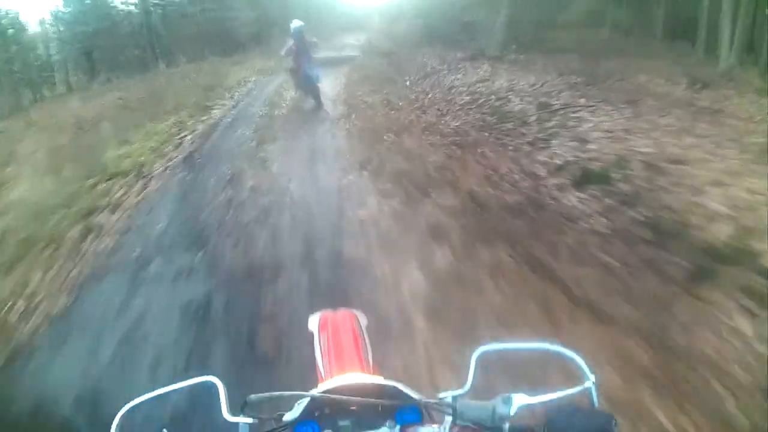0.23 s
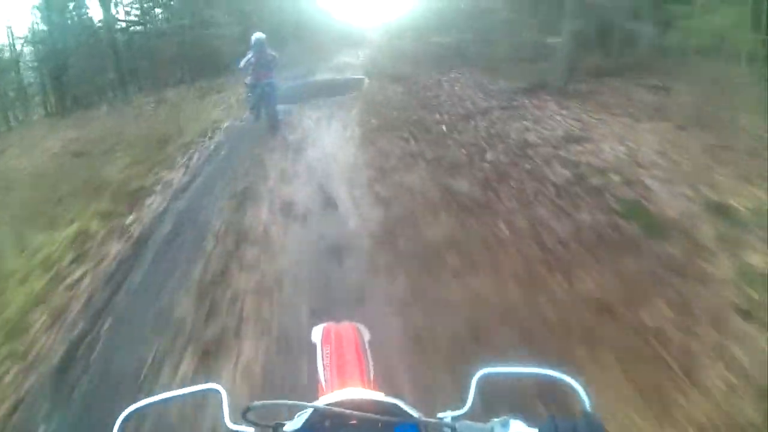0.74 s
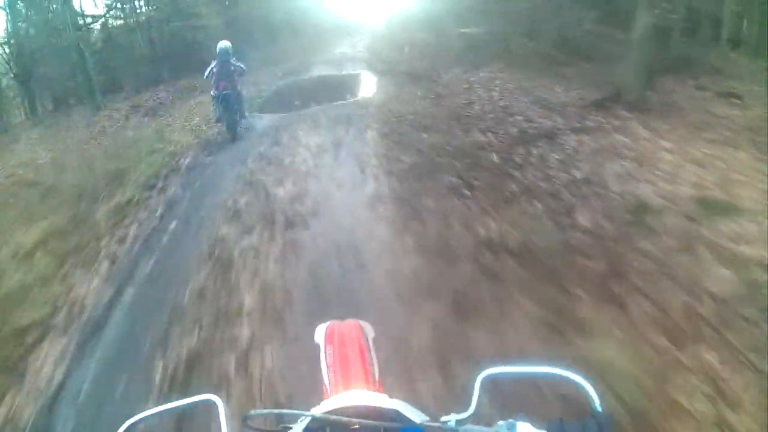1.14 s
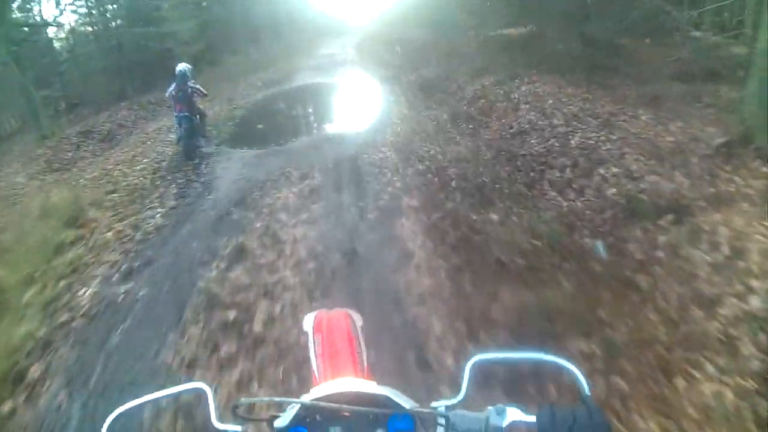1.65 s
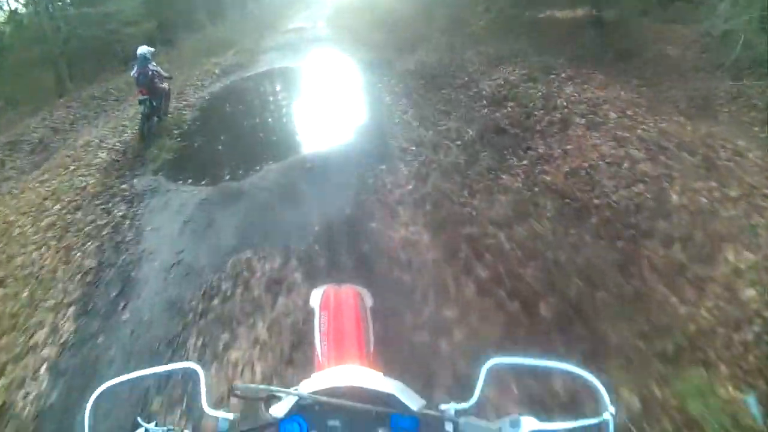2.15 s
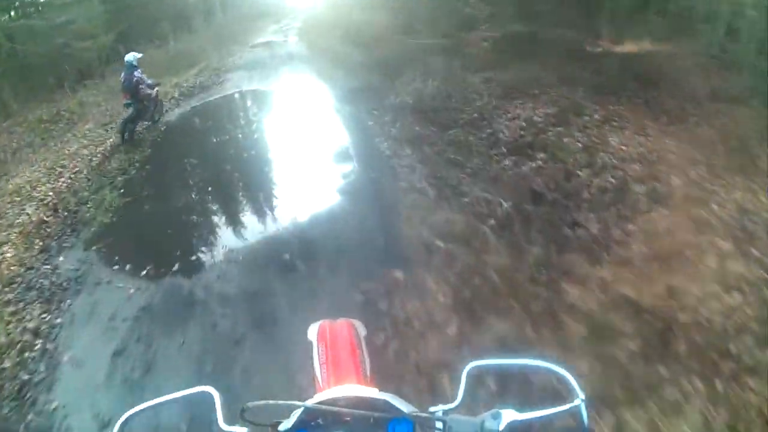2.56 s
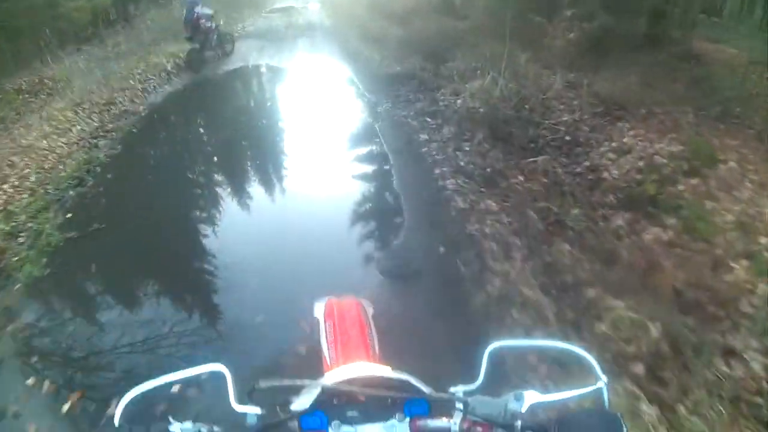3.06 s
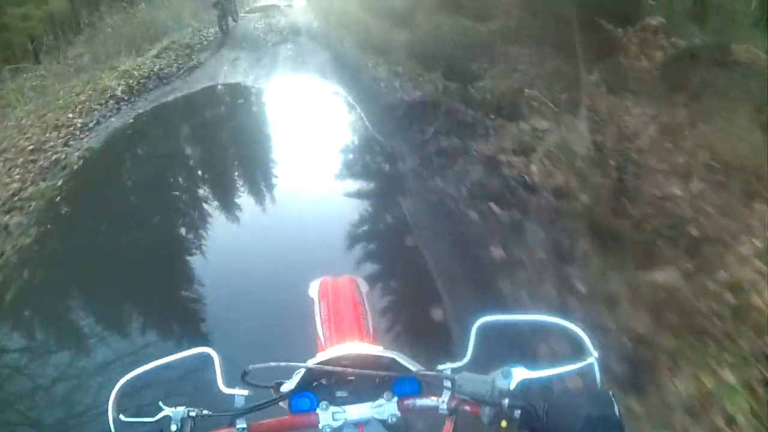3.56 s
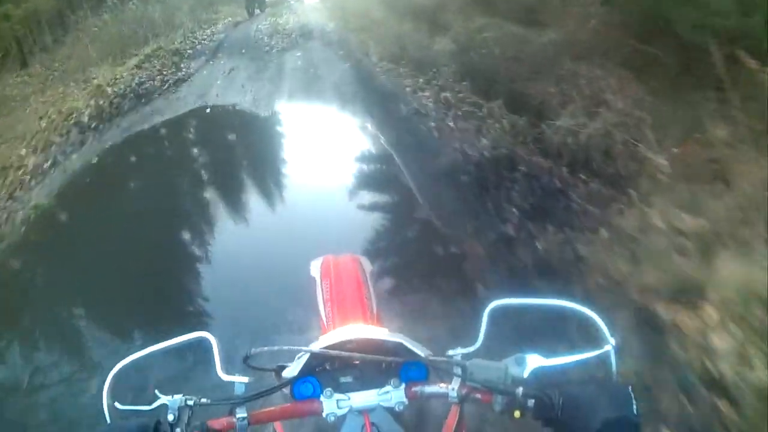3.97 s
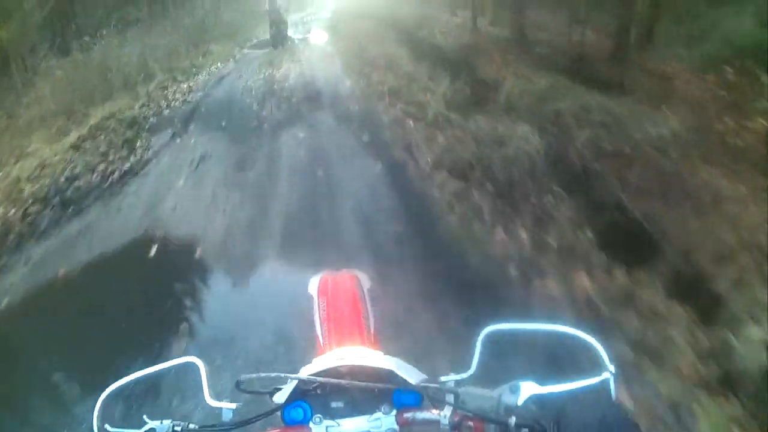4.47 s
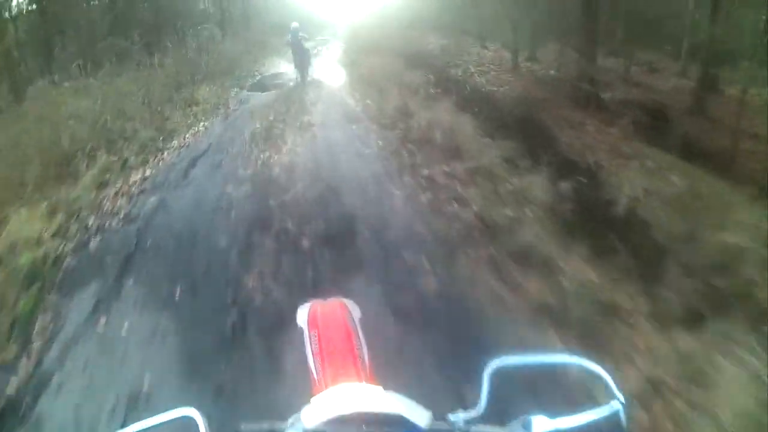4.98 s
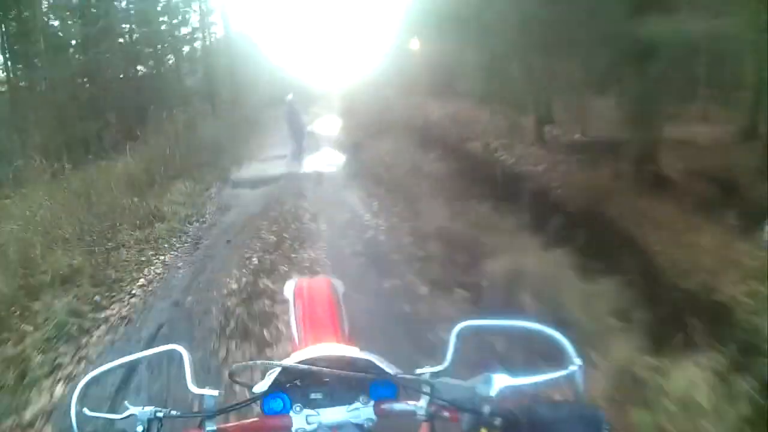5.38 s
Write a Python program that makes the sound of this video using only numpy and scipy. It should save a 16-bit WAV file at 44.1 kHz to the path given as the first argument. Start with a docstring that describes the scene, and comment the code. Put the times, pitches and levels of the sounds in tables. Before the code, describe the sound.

Muffled wind gusts and runs of hard chassis knocks on a moving dirt bike, before its single-cylinder engine builds to a barking pull.

```python
"""A muddy forest track, heard close up from a cased camera on the rider of a four-stroke single dirt bike.
At first the throttle is shut: wind buffets the case, the tyres rumble and the chassis chatters in runs
of hard knocks. From about 3.5 s the engine picks up with a gulping intake, and a puddle sprays the
mudguard. Around 5 s the exhaust barks under load and, at the hardest pull, each firing shakes out a knock.
The loudest peaks overload the microphone, and the closed case dulls everything."""
import sys
import numpy as np
from scipy import signal
from scipy.fft import rfft, irfft
from scipy.io import wavfile
from scipy.ndimage import uniform_filter1d

SR = 44100
rng = np.random.default_rng(int(sys.argv[2]) if len(sys.argv) > 2 else 0)


def materialize(psi):
    """Save the field psi as 16-bit PCM at rate SR to the path in sys.argv[1].

    A 1-D psi becomes a single channel; in a 2-D psi each row is a channel.
    """
    bounded = np.clip(np.atleast_2d(psi).T, -1, 1)
    quanta = np.round(bounded * 32767).astype(np.int16)
    wavfile.write(sys.argv[1], SR, quanta)


N = 248283
TIME = np.arange(N) / SR
FIRING_PHASE = .94  # share of the engine cycle at which the cylinder fires


def undb(db):
    """Decibels to gain."""
    return 10 ** (np.asarray(db) / 20)


def unit(x):
    """Scale to rms 1."""
    return x / np.sqrt(np.mean(x ** 2))


def curves(table):
    """The columns of a table, joined by straight lines in time."""
    time_s, *columns = np.transpose(table)
    return [np.interp(TIME, time_s, column) for column in columns]


def wander(rate_hz):
    """Smooth random drift with rms 1."""
    hold = int(SR / rate_hz)
    steps = np.repeat(rng.standard_normal(N // hold + 1), hold)[:N]
    return unit(uniform_filter1d(steps, hold))


def colour(x, points, size=4096):
    """Minimum-phase filter through points of freq_hz, gain_db."""
    hz, db = np.transpose(points)
    grid_hz = np.maximum(np.fft.rfftfreq(size, 1 / SR), 1)
    gain = undb(np.interp(np.log(grid_hz), np.log(hz), db))
    cepstrum = irfft(np.log(gain))
    cepstrum[1:size // 2] *= 2
    cepstrum[size // 2 + 1:] = 0
    impulse = irfft(np.exp(rfft(cepstrum)))
    return signal.fftconvolve(x, impulse)[:N]


def resonate(x, modes):
    """Parallel resonances, each given as pitch_hz, width_hz, gain_db."""
    return sum(undb(db) * signal.lfilter(*signal.iirpeak(hz, hz / width_hz, fs=SR), x)
               for hz, width_hz, db in modes)


def highpass(x, hz):
    """Second-order bass cut."""
    return signal.sosfilt(signal.butter(2, hz, "high", fs=SR, output="sos"), x)


# tyre rumble as it reaches the rider: freq_hz, gain_db
RUMBLE_SPECTRUM = [(25, -36), (50, -23.5), (100, -2), (200, -4), (310, 3.5), (450, -6), (1000, -11),
                   (2000, -25.5), (4000, -23.5), (9000, -49.5)]

def tyres(level_db=-41, bumps_db=2.0):
    """Down on the track, knobbly tyres rumble over uneven ground."""
    level = undb(level_db + bumps_db * wander(13))
    return level * unit(colour(rng.standard_normal(N), RUMBLE_SPECTRUM))


# water thrown up by the tyres in a puddle: time_s, level_db
SPRAY_LEVEL = [(0, -89), (3.3, -78.5), (3.75, -42), (4.1, -40), (4.6, -40), (4.9, -49), (5.2, -66.5),
               (5.63, -76)]

def spray(patter_db=3):
    """Below the camera, droplets patter on the mudguard as a thin, uneven hiss."""
    level_db, = curves(SPRAY_LEVEL)
    drops = rng.standard_normal(N) * undb(patter_db * wander(300))
    mudguard = [(2190, 470, 1.5), (3950, 1700, -9.5), (9800, 900, -16.5)]
    return undb(level_db) * unit(resonate(drops, mudguard))


# gusts striking the case: start_s, length_s, peak_db
WIND_GUSTS = [(0, 0.081, -25.5), (0.179, 0.22, -21), (0.415, 0.071, -20.5), (.59, 0.15, -20.5),
              (0.803, 0.054, -23), (.935, .025, -24.5), (1.003, 0.034, -24.5), (1.192, 0.047, -31.5),
              (1.298, 0.14, -27.5), (1.571, 0.063, -30), (1.948, 0.058, -33), (2.868, .1, -35)]

def gusts(attack_s=0.012, release_s=0.019, build_db=3):
    """Summed power of the gusts: each sets in quickly, builds and collapses."""
    power = np.zeros(N)
    for start_s, length_s, peak_db in WIND_GUSTS:
        age_s = TIME - start_s
        attack = np.clip(age_s / attack_s, 0, 1)
        build = undb(peak_db - build_db * np.clip(1 - age_s / length_s, 0, 1))
        release = np.exp(-np.maximum(age_s - length_s, 0) / release_s)
        power += (attack * build * release) ** 2
    return power


# air rushing over the case between and under the gusts: time_s, level_db
RUSH_LEVEL = [(0, -30.5), (.55, -29.5), (1.13, -35), (1.5, -31), (1.78, -32), (2.08, -40.5), (2.3, -33),
              (2.6, -35), (2.72, -37.5), (3.05, -33.5), (3.66, -28.5), (4.08, -31), (4.55, -25),
              (5.63, -21)]
# wind as heard inside the hollow case: freq_hz, gain_db
WIND_SPECTRUM = [(30, -40), (100, -22), (200, -17), (330, -9), (480, -3), (720, .5), (1000, 0), (1300, -5),
                 (1600, -11), (2000, -17.5), (3000, -29), (4200, -33), (9000, -48), (14000, -56)]

def wind(flutter_db=1.1, slap_db=2.0):
    """Right at the microphone, eddies slap the case and ring its hollow, in gusts with a quick flutter."""
    rush_db, = curves(RUSH_LEVEL)
    level = np.sqrt(undb(rush_db) ** 2 + gusts())
    eddies = rng.standard_normal(N) * undb(flutter_db * wander(110))
    slaps = undb(slap_db * wander(500))
    return level * unit(colour(eddies * slaps, WIND_SPECTRUM))


# runs of chassis knocks; quickening is a share of the mean gap, the three strengths are relative:
# first_s, last_s, count, quickening, first_db, middle_db, last_db, pitch_hz
KNOCK_RUNS = [(.0153, .1074, 5, 0.018, 3, 1.5, -6.5, 955), (0.9644, 1.019, 3, .05, -4, -3, -5, 1030),
              (1.381, 1.4348, 3, 0.12, -10, -0.5, 1, 1090),
              (1.578, 1.6615, 4, 0.054, -10.5, -1, -2.5, 1036),
              (1.7425, 1.8453, 5, -0.0054, -8, 2, 0, 1056), (2.0756, 2.2976, 9, 0.1, -26, 0.5, -5, 860),
              (2.325, 2.4505, 6, 0.084, -5.5, 4.5, 1, 974), (2.4728, 2.6112, 7, 0.00056, 3.5, 2, 4.5, 1030),
              (3.0868, 3.1577, 4, 0.086, 0, 1, 0, 1070), (3.18, 3.359, 9, -0.00087, 3, 3, 5, 994),
              (3.3821, 3.6663, 14, 0.18, 6, 6.5, 8.5, 966)]
# single knocks between the runs: start_s, strength_db, pitch_hz
SINGLE_KNOCKS = [(.4451, -2.5, 910), (.9454, -9, 1040), (2.956, -13, 1040), (3.0602, -13, 1100)]

def coasting_knocks(scatter_db=1.2, detune=0.039):
    """Knocks off the throttle: most runs quicken, and their strength follows a curve with some scatter."""
    knocks = list(SINGLE_KNOCKS)
    for first_s, last_s, count, quickening, first_db, middle_db, last_db, pitch_hz in KNOCK_RUNS:
        along = np.linspace(0, 1, round(count))
        starts_s = first_s + (last_s - first_s) * (along + quickening * along * (1 - along))
        parabola = np.polyfit([0, .5, 1], [first_db, middle_db, last_db], 2)
        harder, sharper = rng.standard_normal((len(along), 2)).T
        strengths_db = np.polyval(parabola, along) + scatter_db * harder
        knocks += zip(starts_s, strengths_db, pitch_hz * (1 + detune * sharper))
    return knocks


def pull_knocks(from_s=5.05, to_s=5.345, strength_db=4.2, pitch_hz=1086):
    """At the hardest pull every firing shakes out a knock."""
    firings_s = TIME[crossings(crank(), FIRING_PHASE)]
    return [(start_s, strength_db, pitch_hz) for start_s in firings_s if from_s < start_s < to_s]


# what a soft knock rings in the chassis: pitch_ratio, rise_s, gain_db
CHASSIS_MODES = [(1, 0.000834, 1.5), (1.3, 0.00072, -10), (.66, 0.0011, -7), (.35, 0.0014, -12.5),
                 (2, 0.00066, -22), (3.2, 0.001194, -18), (.97, 0.003043, -21.5)]
# ring of the case, which colours the rattle and the combustion: freq_hz, gain_db
CASE_RESPONSE = [(30, -37), (150, -19), (300, -7), (600, -1), (1000, 1.5), (1350, -3), (2000, -9.5),
                 (3200, -18.5), (5000, -12.5), (12000, -43)]

def chatter(knock_db=-8.0, rattle_db=-7, rattle_s=0.0038, stretch_per_db=0.0159):
    """Under the rider, loose chassis parts hammer: each knock swells briefly and trails a fine rattle."""
    t = TIME[:SR // 25]
    rings, grit = np.zeros((2, N + len(t)))
    for start_s, strength_db, pitch_hz in coasting_knocks() + pull_knocks():
        span = slice(int(start_s * SR), int(start_s * SR) + len(t))
        stretch = np.exp(stretch_per_db * max(strength_db, 0))  # a harder knock rings longer
        for pitch_ratio, rise_s, gain_db in CHASSIS_MODES:
            peak_s = rise_s * stretch
            swell = (t / peak_s * np.exp(1 - t / peak_s)) ** 2
            swing = np.cos(2 * np.pi * pitch_hz * pitch_ratio * (t - peak_s))
            rings[span] += undb(strength_db + gain_db) * swell * swing
        grit[span] += undb(strength_db) * rng.standard_normal(len(t)) * np.exp(-t / rattle_s)
    return undb(knock_db) * rings[:N] + undb(rattle_db) * colour(grit[:N], CASE_RESPONSE)


# engine speed, sinking and then picking up: time_s, firing_hz
ENGINE_SPEED = [(0, 38), (3.3, 26), (3.7, 30.3), (3.83, 32.2), (3.98, 33.9), (4.07, 33.5), (4.32, 37.2),
                (4.43, 35.5), (4.52, 37.1), (4.9, 40.3), (5, 42.8), (5.08, 47.6), (5.14, 49.6), (5.3, 45.8),
                (5.45, 51.4), (5.63, 57)]

def crank(zero_s=4):
    """Engine cycles turned, counted from zero_s; there is one firing to a cycle."""
    firing_hz, = curves(ENGINE_SPEED)
    cycle = np.cumsum(firing_hz) / SR
    return cycle - cycle[zero_s * SR]


def crossings(cycle, phase):
    """The samples at which the engine passes a given share of its cycle."""
    return np.flatnonzero(np.diff(np.floor(cycle - phase)) > 0)


def strokes(cycle, phase, scatter_db, jitter_s):
    """One pulse per engine cycle, each a little off in size and time."""
    onsets = crossings(cycle, phase)
    later, harder = rng.standard_normal((len(onsets), 2)).T
    onsets += (jitter_s * SR * later).astype(int)
    pulses = np.zeros(N)
    pulses[np.clip(onsets, 0, N - 1)] = undb(scatter_db * harder)
    return pulses


# tones of the exhaust pipe: firing_multiple, gain_db
PIPE_HARMONICS = [(2, -21), (4, -10), (5, -5), (6, 0), (7, -7)]

def drone(cycle, waver_db=0.77):
    """Behind the rider, the pipe hums on wavering harmonics of the firing rate."""
    return unit(sum(undb(db + waver_db * wander(18)) * np.sin(2 * np.pi * (multiple * cycle + rng.random()))
                    for multiple, db in PIPE_HARMONICS))


# resonances of the air box: pitch_hz, width_hz, gain_db
AIRBOX_MODES = [(289, 110, -1), (530, 36, -7.5)]

def intake(cycle, shut_gain=0.66, low_cut_hz=182):
    """The air column is kicked as the inlet opens and again as it shuts: a double gulp in the air box."""
    opens = strokes(cycle, phase=.6, scatter_db=1, jitter_s=.00005)
    shuts = strokes(cycle, phase=.94, scatter_db=1.2, jitter_s=.00005)
    airbox = resonate(opens + shut_gain * shuts, AIRBOX_MODES)
    gulps = resonate(airbox, [(304, 240, 0)])
    return unit(highpass(highpass(gulps, low_cut_hz), low_cut_hz))


# resonances of the engine block and silencer: pitch_hz, width_hz, gain_db
METAL_MODES = [(520, 180, 1.5), (656.5, 120, 1.5), (867, 140, -3.5), (1185, 270, -2.5), (1330, 1600, -8.5),
               (3000, 1200, -10)]

def combustion(cycle, load, round_trip_s=0.002786, pipe_return=0.41, puff_s=0.017, hiss_db=-21.0):
    """The firing thump and the exhaust blow ring the metal; a puff of rough, hissing gas follows each."""
    firing = strokes(cycle, FIRING_PHASE, scatter_db=1.5, jitter_s=.00003)
    exhaust = strokes(cycle, phase=.26, scatter_db=1.5, jitter_s=.00003)
    blows = firing + load * exhaust
    # each blow runs to and fro in the pipe, weaker at every return
    pipe_loop = np.r_[1, np.zeros(int(round_trip_s * SR) - 1), -pipe_return]
    echoes = signal.lfilter([1], pipe_loop, blows)
    puff_envelope = signal.lfilter([1], [1, -np.exp(-1 / (puff_s * SR))], blows)
    puffs = puff_envelope * rng.standard_normal(N)
    metal = resonate(unit(echoes) + .36 * unit(puffs), METAL_MODES)
    hiss = resonate(puffs, [(3180, 2000, 0)])
    return unit(colour(metal, CASE_RESPONSE)) + undb(hiss_db) * unit(hiss)


# how hard the engine works: time_s, intake_db, combustion_db
ENGINE_EFFORT = [(0, -52.5, -50), (3.2, -49, -43), (3.55, -36.5, -40), (3.9, -27, -34), (4.2, -27.5, -31.5),
                 (4.87, -26, -27), (4.98, -22, -22), (5.1, -27, -20.5), (5.3, -24, -19.5),
                 (5.4, -21.5, -22.5), (5.63, -29, -19)]

def engine(full_drone_db=-26, drone_range_db=27):
    """Close under the rider: the pipe's drone, the intake and the combustion, all locked to the crank."""
    intake_db, combustion_db = curves(ENGINE_EFFORT)
    load = np.clip((combustion_db + 34.5) / 15, 0, 1)  # the exhaust barks only on a hard pull
    cycle = crank()
    hum = undb(full_drone_db - drone_range_db * (1 - load)) * drone(cycle)
    gulp = undb(intake_db) * intake(cycle)
    bark = undb(combustion_db) * combustion(cycle, load)
    return hum + gulp + bark


def scene():
    """One channel; every source rides along with the camera, so no distance changes."""
    return (engine() + chatter() + wind() + tyres() + spray())[None]


# the closed case and the camera swallow the treble: freq_hz, gain_db
CAMERA_RESPONSE = [(20, -27), (80, -7), (1200, 2), (1600, -1), (2200, -11), (3100, -13.5), (4000, -22.5),
                   (4700, -32.5), (5200, -54.5), (6200, -39), (7000, -49.5), (8000, -29.5), (10000, -28),
                   (12500, -34.5)]

def record(dry, ceiling=0.23, hardness=14, top_hz=12800):
    """The microphone overloads on peaks; the camera thins the bass, dulls the sound and cuts the top."""
    clipped = dry[0] / (1 + np.abs(dry[0] / ceiling) ** hardness) ** (1 / hardness)
    muffled = highpass(colour(clipped, CAMERA_RESPONSE), hz=50)
    top_cut = signal.ellip(8, .2, 70, top_hz, fs=SR, output="sos")
    return signal.sosfilt(top_cut, muffled)[None]


dry = scene()
out = record(dry)
materialize(out)
```